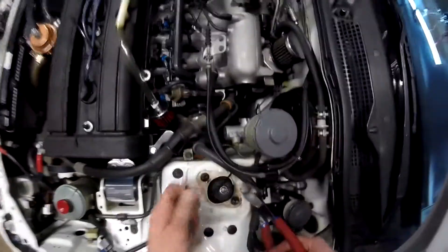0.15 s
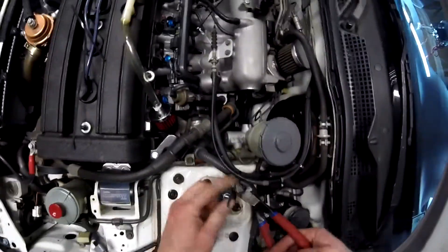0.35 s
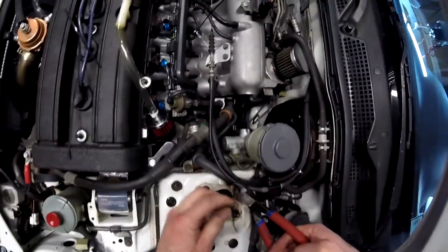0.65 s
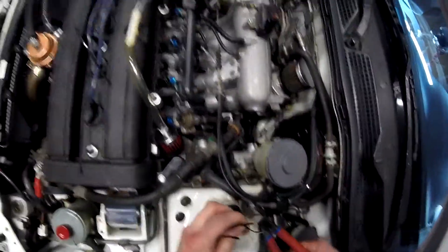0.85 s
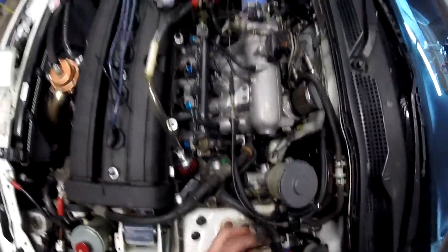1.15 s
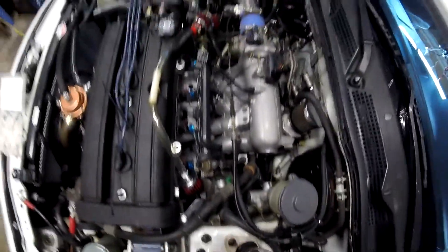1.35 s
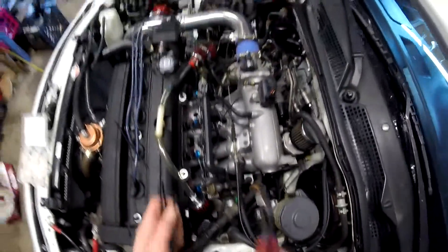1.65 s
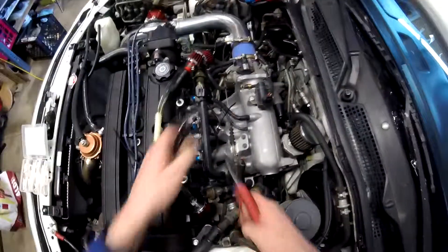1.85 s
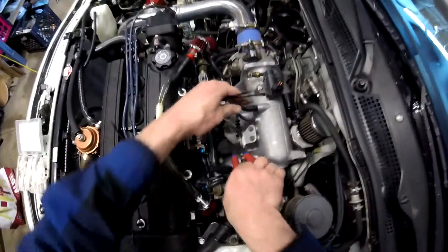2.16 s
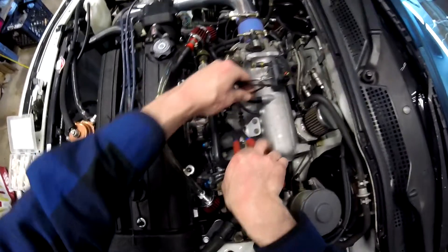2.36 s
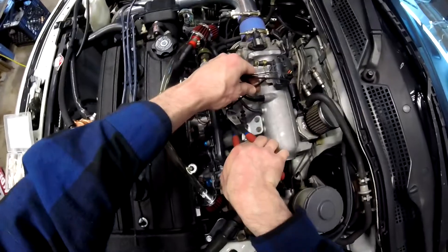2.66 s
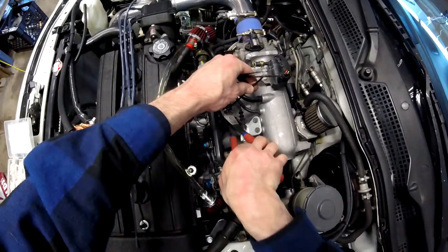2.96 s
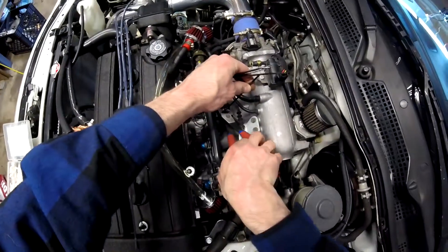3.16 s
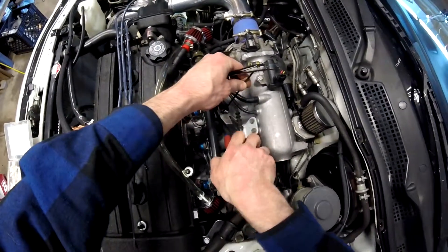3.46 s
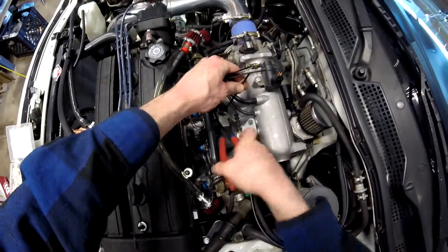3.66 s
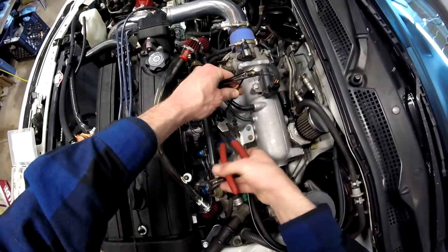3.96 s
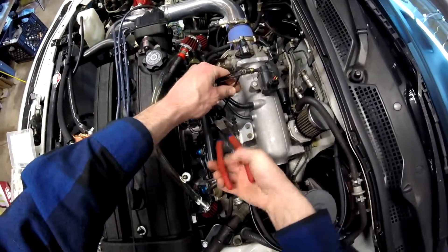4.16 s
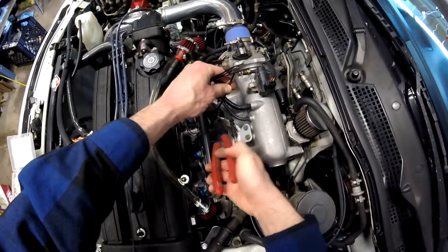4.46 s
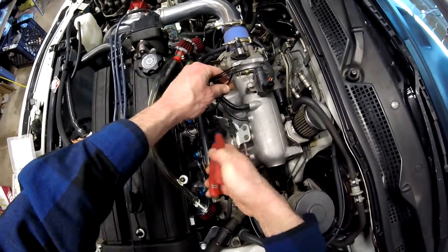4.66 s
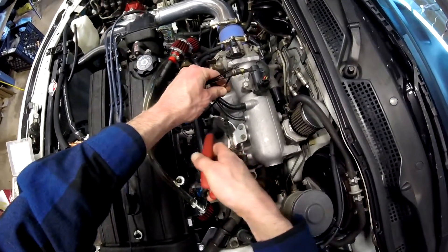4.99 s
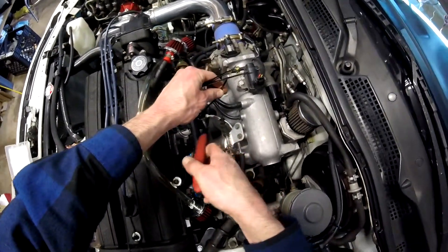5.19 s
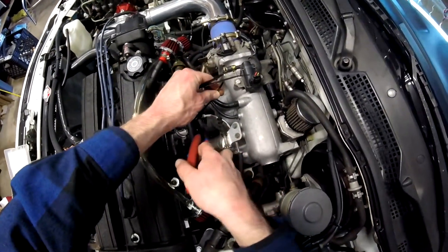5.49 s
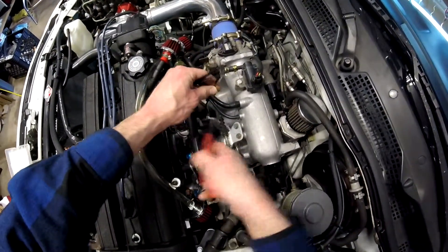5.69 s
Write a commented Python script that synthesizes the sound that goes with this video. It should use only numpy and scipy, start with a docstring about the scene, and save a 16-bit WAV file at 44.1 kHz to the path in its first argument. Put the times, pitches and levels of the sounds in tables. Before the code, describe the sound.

A quiet garage, heard from close above an engine bay: soft low rumble, a thin steady motor hum and faint hiss run throughout. Hands and sleeves brush lightly from the start; at 0.3 s a plastic tie zips over its teeth in a tiny ratcheting burst, and at about 0.55 s a tool taps dully two or three times. At 0.97 s cutters bite through plastic with a loud, bright, dry snap and short steely ring. At 1.1 s something knocks hard on sheet metal, low and hollow with a chattering rattle, and bounces lighter and higher at 1.17 s; the panel ring and room echo die quickly. A bird-like chirp sounds faintly at 1.3 s, with cloth rustle and a small tick around 1.5 s. Then mostly quiet, with faint strokes and sparse distant chirps, denser twitter from about 4 s, a clearer call at 5.0 s, clicking tool ticks at 5.4 s and a fainter one at 5.6 s.

```python
"""Side cutters snip a zip tie in a car's engine bay: sharp noise snaps ring a bank of damped modes.
Just after, something knocks on the sheet metal and bounces: chattering pushes, rattle and panel modes.
A short pull clicks a tie over its pawl, hands and sleeves brush as filtered noise, and tools tick as short sines.
Gliding sines make faint chirps like distant birds, over shaped-noise rumble and hiss and a thin sine hum;
a decaying-noise tail is the garage's echo."""
import sys
import numpy as np
from scipy import signal
from scipy.fft import rfft, irfft, next_fast_len
from scipy.io import wavfile
from scipy.ndimage import map_coordinates

SR = 44100
rng = np.random.default_rng(int(sys.argv[2]) if len(sys.argv) > 2 else 0)


def wrap_up_sound(samples):
    """Save the sound to the file named by the first command line argument, as 16-bit audio."""
    columns = np.atleast_2d(samples).T
    # keep every value between -1 and 1, then stretch to whole-number steps
    tamed = np.clip(columns, -1, 1)
    steps = np.round(tamed * 32767).astype(np.int16)
    wavfile.write(sys.argv[1], SR, steps)


N = 257082
TOP_HZ = 14400
T = np.arange(N) / SR
RING = T[:SR // 2]  # time base of decays and tails


def amp(db):
    """Decibels to gain."""
    return 10 ** (np.asarray(db) / 20)


def unit(x):
    """Scale to rms 1."""
    return x / np.sqrt(np.mean(x ** 2))


def add(out, s, x):
    """Mix x into out from time s."""
    i = int(s * SR)
    out[i:i + len(x)] += x[:N - i]


def fade(t60_s):
    """Exponential decay, 60 dB in t60_s."""
    return np.exp(-np.log(1000) * RING / t60_s)


def noise():
    """White noise as long as RING."""
    return rng.standard_normal(len(RING))


def colour(x, points):
    """Causal minimum-phase filter whose gain follows (Hz, dB) points."""
    size = next_fast_len(len(x) + SR // 10) * 2
    hz, db = np.transpose(points)
    f = np.maximum(np.arange(size // 2 + 1) * SR / size, 1)
    gain = amp(np.interp(np.log(f), np.log(hz), db))
    # folding the cepstrum gives minimum phase
    cepstrum = irfft(np.log(gain))
    cepstrum[1:size // 2] *= 2
    cepstrum[size // 2 + 1:] = 0
    return irfft(rfft(x, size) * np.exp(rfft(cepstrum)))[:len(x)]


def band(x, lo_hz, hi_hz):
    """Keep what lies between two frequencies, TOP_HZ at most."""
    high = signal.butter(2, lo_hz, "high", fs=SR, output="sos")
    low = signal.butter(2, min(hi_hz, TOP_HZ), fs=SR, output="sos")
    return signal.sosfilt(np.vstack([high, low]), x)


def walk(rate_hz, t=T):
    """Smooth random curve with spread near 1, through rate_hz random knots a second."""
    knots = rng.standard_normal(len(t) // 20)
    return map_coordinates(knots, [t * rate_hz], order=2, mode="nearest")


def scattered(span_s, count):
    """Random moments, one in each equal part of a span."""
    start, end = span_s
    return start + (end - start) * (np.arange(count) + rng.random(count)) / count


def background(rumble_db=-43.5, hiss_db=-61, swell_db=0.24, hum_waver_db=1, hum_drift=0.001):
    """Steady air of the garage: slightly swelling rumble, even hiss and the lines of a small motor's hum."""
    # Spectra of the low air noise and of the microphone's hiss. Each row: frequency in Hz, relative level in dB.
    rumble_points = [(12, -5.5), (28, 1), (42, -2), (57, 1.5), (95, -3.5), (120, -10.5), (165, -15),
                     (190, -13), (230, -20), (450, -24.5), (1000, -29), (1800, -33), (3000, -35),
                     (4500, -52.5)]
    hiss_points = [(1000, -17), (4500, -15), (5600, -15), (6100, -10), (6500, 1), (7000, -6.5),
                   (8800, -10.5), (10300, -20.5), (12000, -18.5), (13500, -41), (14600, -65)]
    # Lines of the hum. Each row: mean frequency in Hz, mean rms level in dB.
    hum_lines = [(188.4, -63.5), (592.2, -75), (710.8, -62.5), (829.5, -75.5)]
    rumble = unit(colour(rng.standard_normal(N), rumble_points)) * amp(rumble_db + swell_db * walk(5.8))
    hiss = unit(colour(rng.standard_normal(N), hiss_points)) * amp(hiss_db)
    turning_s = np.cumsum(1 + hum_drift * walk(3.84)) / SR  # all lines drift together
    hum = np.zeros(N)
    for hz, db in hum_lines:
        level = np.sqrt(2) * amp(db + hum_waver_db * walk(9))
        hum += level * np.sin(2 * np.pi * hz * turning_s)
    return rumble + hiss + hum


def brushes(grain_db=3, lowest_hz=150):
    """Cloth and skin catch and slip: grainy noise in bell-shaped strokes, each with its own upper limit."""
    # Firmer strokes of hands and sleeves.
    # Each row: centre in seconds, length between 1/e points in seconds, level in dB, highest frequency in Hz.
    firm_strokes = [(0.142, 0.36, -59, 2500), (0.414, 0.16, -63, 9000), (1.432, 0.49, -59.5, 9000),
                    (1.553, 0.033, -54, 5000), (1.631, 0.073, -54, 9000), (2.244, 0.62, -58.5, 1410),
                    (2.687, 0.14, -65.5, 8000), (4.037, 0.1, -65, 7000), (5.644, 0.0294, -59.5, 8000),
                    (5.74, 0.2, -62, 7000)]
    # Spectrum of rubbing cloth. Each row: frequency in Hz, relative level in dB.
    cloth_points = [(200, 2), (900, -9.5), (2200, 2), (3500, 1), (5000, -1.5), (6400, -8), (9000, -10),
                    (14000, -41.5)]
    grain = rng.standard_normal(N) * amp(grain_db * walk(180))
    rub = unit(colour(grain, cloth_points))
    # light strokes while the hands work, same columns
    light_strokes = [(s, 0.093, -64.5, 7000) for s in scattered((1.8, 4.8), count=6)]
    out = np.zeros(N)
    for s, length_s, db, hi_hz in firm_strokes + light_strokes:
        stroke = np.exp(-(2 * (T - s) / length_s) ** 2)
        out += amp(db) * stroke * band(rub, lowest_hz, hi_hz)
    return out


def zip_pull(start_s=0.3085, level_db=-45.5, length_s=0.054, teeth_per_s=1250, uneven=.2, rub=0.23,
             attack_s=.002, hold_s=.017, release_s=.014):
    """The pawl snaps over each tooth as the strap rubs through; the tug's force sets speed and level."""
    # Spectrum of the pawl and head. Each row: frequency in Hz, relative level in dB.
    pawl_points = [(300, -10), (1000, -6), (2400, -1.5), (3600, 1), (4700, -1), (6050, -1), (6400, 8.5),
                   (6900, -7), (8600, -7), (10000, -18), (14000, -31)]
    t = np.arange(0, length_s, 1 / SR)
    force = np.minimum(t / attack_s, 1) * np.exp(-np.maximum(t - hold_s, 0) / release_s)
    speed = teeth_per_s * np.sqrt(force) * (1 + uneven * walk(400, t))
    teeth = np.floor(np.cumsum(speed) / SR)
    clicks = np.diff(teeth, prepend=0) * amp(2 * rng.standard_normal(len(t)))  # 2 dB spread
    friction = rub * rng.standard_normal(len(t))
    out = np.zeros(N)
    add(out, start_s, unit(colour(clicks + friction, pawl_points)) * amp(level_db) * force)
    return out


def ticks(scatter_db=-6, scatter_t60_s=0.039, attack_s=0.00023):
    """A light contact: a short ring of one resonance, with narrow noise scattered by the parts nearby."""
    # Light taps and ticks of tool and fingers.
    # Each row: start in seconds, level in dB, pitch in Hz, t60 in seconds.
    taps = [(0.5527, -45.5, 1570, 0.028), (0.5548, -41.5, 447, 0.044), (0.5660, -35, 500, 0.015),
            (1.478, -38.5, 3780, 0.0065), (5.418, -39, 2050, 0.0092), (5.4362, -32, 2010, 0.012),
            (5.642, -45, 4200, .009)]
    out = np.zeros(N)
    for s, db, hz, t60_s in taps:
        scatter = band(noise() * fade(scatter_t60_s), hz * .8, hz * 1.25)
        ring = np.sin(2 * np.pi * hz * RING) * fade(t60_s) * (1 - np.exp(-RING / attack_s))
        add(out, s, amp(db) * (ring + amp(scatter_db) * scatter))
    return out


def whistle(length_s, start_hz, glide, waver=.016, flutter_db=3):
    """A thin sine gliding in octaves per second, wavering in pitch and level."""
    t = np.arange(0, length_s, 1 / SR)
    hz = start_hz * 2 ** (glide * t) * (1 + waver * walk(413, t))
    swell = signal.windows.tukey(len(t), .5) * amp(flutter_db * walk(209, t))
    return swell * np.sqrt(2) * np.sin(2 * np.pi * np.cumsum(hz) / SR)


def birds(level_db=-2.5, call_glide=-0.18, call_waver=0.011, call_flutter_db=1.5, echo_s=.115, echo_db=-14,
          twitter_glide=-1.2, glide_spread=1.13, outdoor_db=-5, outdoor_t60_s=0.86):
    """Two-voiced calls with a slap off a wall, chirps and faint twitter, lingering in the echo outdoors."""
    # Calls of the nearest bird. Each row: start in seconds, level in dB before level_db.
    calls = [(1.277, -48.5), (5.036, -52)]
    # Clearer chirps of the other birds.
    # Each row: start in s, length in s, first pitch in Hz, glide in octaves per s, level in dB before level_db.
    chirps = [(0.58, 0.033, 3250, -0.5, -59.5), (0.78, .125, 2800, 0, -65), (1.553, 0.084, 3280, 2, -58),
              (1.70, 0.068, 3530, -.25, -62), (3.21, 0.059, 3210, -2, -65), (3.517, 0.1, 2750, -0.2, -65),
              (3.66, 0.042, 3310, 1, -65), (4.192, .035, 3170, 0, -62), (4.53, .087, 4030, -2, -64.5),
              (4.575, 0.16, 2830, 1.2, -64), (4.722, 0.12, 2930, -2, -65.5), (4.99, 0.053, 3105, 1, -61.5),
              (5.31, .10, 2370, -0.4, -64.5), (5.701, 0.15, 2840, 1.1, -62.5)]
    lower_s, lower_hz = 0.066, 3560
    upper_s, upper_hz, upper_db = 0.043, 6020, -7
    twitter_s, twitter_hz, twitter_db, octave_spread = 0.062, 3470, -68.5, .15
    out = np.zeros(N)
    for s, db in calls:
        lower = amp(db) * whistle(lower_s, lower_hz, call_glide, call_waver, call_flutter_db)
        add(out, s, lower)
        add(out, s + echo_s, amp(echo_db) * lower)
        add(out, s, amp(db + upper_db) * whistle(upper_s, upper_hz, 0, call_waver, call_flutter_db))
    for s, length_s, hz, glide, db in chirps:
        add(out, s, amp(db) * whistle(length_s, hz, glide))
    for s in scattered((3.9, 5.1), count=8):
        pitch, bend = rng.standard_normal(2)
        hz = twitter_hz * 2 ** (octave_spread * pitch)
        add(out, s, amp(twitter_db) * whistle(twitter_s, hz, twitter_glide + glide_spread * bend))
    tail = noise() * fade(outdoor_t60_s)
    echo = signal.fftconvolve(out, tail / np.sqrt(np.sum(tail ** 2)))[:N]
    return amp(level_db) * (out + amp(outdoor_db) * echo)


def snip(ring_db=-25.0, snap_db=-5.0, crack_db=-18.5, crack_t60_s=0.0073, steel_db=-57, steel_t60_s=0.22):
    """The strap breaks in quick steps: each a snap with a fizz of tearing that rings the hand-damped cutters."""
    # The jaws bite through the strap and meet. Each row: start in seconds, relative level in dB.
    bites = [(0.9748, 3), (0.976, -6.5), (0.9773, -15), (0.9779, -3.5), (0.9794, -8.5)]
    # Ring of the cutters. Each row: frequency in Hz, width in Hz, relative level in dB.
    cutter_modes = [(1190, 47, -24), (2100, 170, -23), (2380, 140, -11), (2630, 140, -23), (3160, 64, -9),
                    (4260, 150, -9), (4400, 156, -13), (5520, 69, -5.5), (6420, 110, 2.5), (7650, 160, -26),
                    (8460, 500, -23)]
    # Spectrum of the breaking plastic. Each row: frequency in Hz, relative level in dB.
    crack_points = [(100, 1), (220, 5.5), (500, 0), (750, -30), (1400, -23), (2100, 6), (3300, 8.5),
                    (4800, 1.5), (6400, 4), (7500, -4), (9000, -1), (10000, -16), (13000, -33),
                    (14500, -58)]
    ring = np.zeros(len(RING))
    for hz, width_hz, db in cutter_modes:
        ring += amp(db) * np.exp(-np.pi * width_hz * RING) * np.sin(2 * np.pi * hz * RING)
    out = np.zeros(N)
    for s, db in bites:
        snap = amp(snap_db) * (RING == 0)
        tearing = amp(crack_db) * noise() * fade(crack_t60_s)
        add(out, s, amp(db) * (amp(ring_db) * ring + colour(snap + tearing, crack_points)))
    # the jaws sing on faintly
    steel = fade(steel_t60_s) * sum(np.sin(2 * np.pi * hz * RING) for hz in (3036, 5464, 5669))
    add(out, bites[0][0], amp(steel_db) * steel)
    return out


def contact(push_hz, lo_hz, hi_hz, loose_db, rattle_db=-9, rattle_t60_s=0.039,
            push_db=-12, push_t60_s=.013, soft_hz=1000):
    """One contact: a damped sine push, weaker at high pitch, with a burst of rattle, limited to a band."""
    # Dense, quickly damped rattle of the sheet metal. Each row: frequency in Hz, relative level in dB.
    rattle_points = [(80, 3), (160, 15.5), (260, -4), (480, 6.5), (740, -4.5), (1000, 7.5), (1400, -3.5),
                     (1900, -5.5), (2900, -6), (4500, -5.5), (5400, -15), (6500, -12), (8000, -26),
                     (10000, -37), (13000, -32), (15000, -49)]
    push = amp(push_db) * np.sin(2 * np.pi * push_hz * RING) * fade(push_t60_s)
    push /= np.hypot(1, push_hz / soft_hz)
    rattle = colour(noise() * fade(rattle_t60_s), rattle_points)
    return band(push + amp(rattle_db + loose_db) * rattle, lo_hz, hi_hz)


def panel_ring(lo_hz, modes_db=-36, sustain=1.44, place_spread=0.23):
    """The sheet metal rings on in damped modes; where the blow lands weights them at random."""
    # Modes of the sheet metal. Each row: frequency in Hz, relative level in dB, t60 in seconds before sustain.
    panel_modes = [(128, 0, .26), (160, 5, .24), (182, 2, .2), (257, -3, .17), (286, -9, .15),
                   (317, -2, .18), (394, 1, .17), (440, -2, .2), (457, -1, .2), (547, -4, .18),
                   (590, -8, .18), (690, -5, .2), (938, -7, .22), (982, -8, .22), (1045, -11, .14),
                   (1132, -7, .19), (1297, -12, .08), (1570, -8, .15), (1670, -10, .14), (2638, -14, .1),
                   (3128, -16, .09), (4328, -20, .13), (4732, -19, .14)]
    place = 1 + place_spread * rng.standard_normal(len(panel_modes))
    ring = np.zeros(len(RING))
    for weight, (hz, db, t60_s) in zip(place, panel_modes):
        mode = np.sin(2 * np.pi * (hz * RING + rng.random()))
        ring += weight * amp(db) * fade(t60_s * sustain) * mode
    return amp(modes_db) * band(ring, lo_hz, TOP_HZ)


def knocks(crack_reach=.76, crack_loose_db=2.5, lag_s=0.00112, body_hi_hz=1350, body_loose_db=-4.5,
           settle_hz=450, settle_lo_hz=350, settle_hi_hz=3200, settle_loose_db=1.0, settle_loss_db=-7):
    """A hard first touch, a chatter of heavy contacts on the ringing panel, two light ones as it settles."""
    # A blow on the sheet metal and its bounce. Each row: start in seconds, relative level in dB,
    # first push pitch in Hz, lowest frequency stirred in Hz, first-touch crack in dB re the blow, its pitch in Hz.
    blows = [(1.1023, 3, 175, 85, -4.5, 4000), (1.173, -4, 840, 700, -13, 2850)]
    chatter_s, chatter_shrink = .0045, 0.836  # first gap, next gap as a share of it
    chatter_db, chatter_rise_hz = -2, 96  # change from touch to touch
    settle_s, settle_db = .0225, -15  # gap, level re the blow
    out = np.zeros(N)
    for s, db, push_hz, lo_hz, crack_db, crack_hz in blows:
        crack = contact(crack_hz, crack_reach * crack_hz, 2 * crack_hz, crack_loose_db)
        add(out, s, amp(db + crack_db) * crack)
        touch_s = s + lag_s
        add(out, touch_s, amp(db) * panel_ring(lo_hz))
        for k in range(3):
            touch = contact(push_hz + k * chatter_rise_hz, lo_hz, body_hi_hz, body_loose_db)
            add(out, touch_s, amp(db + k * chatter_db) * touch)
            touch_s += chatter_s * chatter_shrink ** k
        for k in range(2):
            rock = contact(settle_hz, settle_lo_hz, settle_hi_hz, settle_loose_db)
            add(out, s + (k + 1) * settle_s, amp(db + settle_db + k * settle_loss_db) * rock)
    return out


def garage(x, build_s=0.0029):
    """Diffuse echo of engine bay and walls: noise bands with own decays; lows last longest, top dies first."""
    # Decay of the echo by band. Each row: centre in Hz, t60 in seconds, relative level in dB.
    echo_bands = [(150, 0.66, 3.5), (500, 0.52, 10.5), (1200, 0.26, 10), (3020, 0.31, 2.5),
                  (6160, 0.29, 2.5), (11000, 0.15, 1)]
    hz, t60_s, db = np.transpose(echo_bands)
    spectrum = rfft(noise())
    log_f = np.log(np.maximum(np.arange(len(spectrum)) * SR / len(RING), 1))
    tail = np.zeros(len(RING))
    for row, decay_s, level_db in zip(np.eye(len(hz)), t60_s, db):
        share = np.interp(log_f, np.log(hz), row)  # triangular crossfade between bands
        tail += amp(level_db) * fade(decay_s) * irfft(spectrum * share, len(RING))
    tail *= 1 - np.exp(-RING / build_s)
    return signal.fftconvolve(x, tail / np.sqrt(np.sum(tail ** 2)))[:N]


def scene(snip_room_db=-14, knock_room_db=-14, hands_room_db=-7, ticks_room_db=-13, birds_room_db=-4):
    """Near sounds are mostly direct; the birds arrive with much echo."""
    sources = [
        (zip_pull() + brushes(), hands_room_db),
        (ticks(), ticks_room_db),
        (birds(), birds_room_db),
        (snip(), snip_room_db),
        (knocks(), knock_room_db),
    ]
    direct = sum(x for x, _ in sources)
    echo = garage(sum(x * amp(room_db) for x, room_db in sources))
    return (direct + echo + background())[None]


def record(dry):
    """A steep elliptic low-pass cuts the top above TOP_HZ."""
    return signal.sosfilt(signal.ellip(8, .2, 70, TOP_HZ, fs=SR, output="sos"), dry)


dry = scene()
out = record(dry)
wrap_up_sound(out)
```